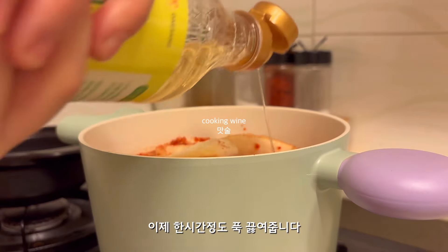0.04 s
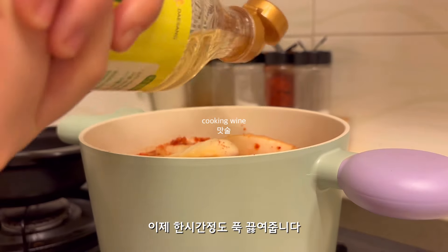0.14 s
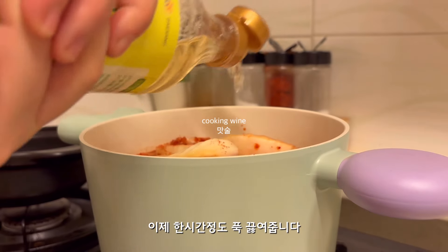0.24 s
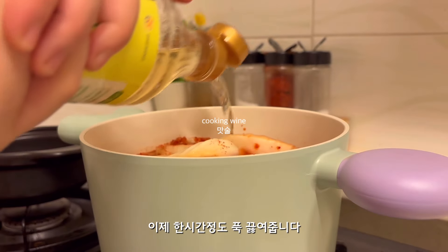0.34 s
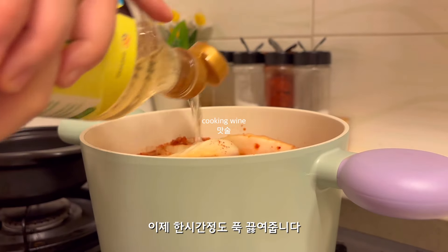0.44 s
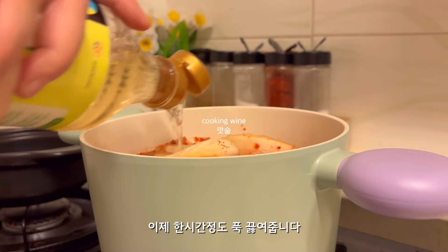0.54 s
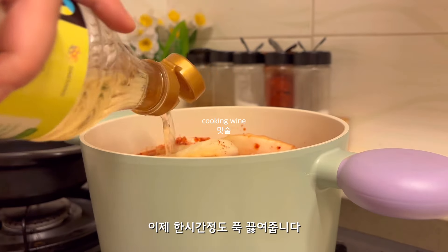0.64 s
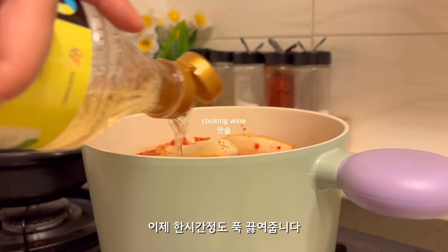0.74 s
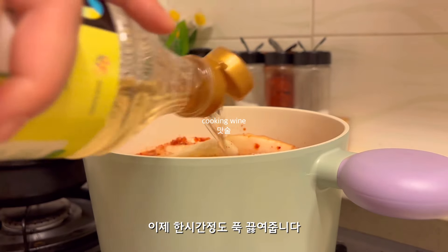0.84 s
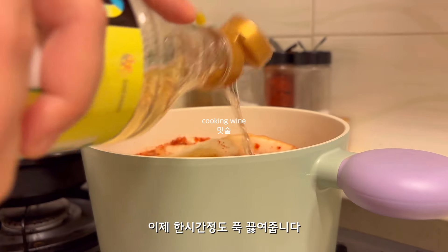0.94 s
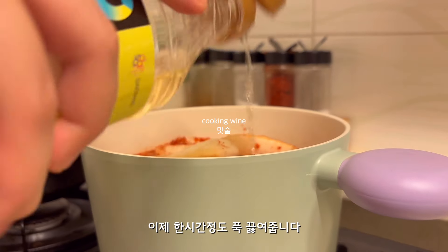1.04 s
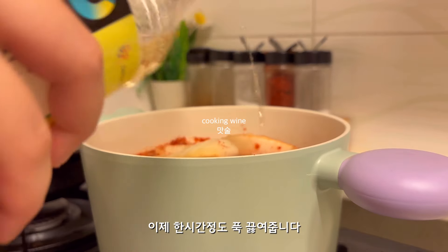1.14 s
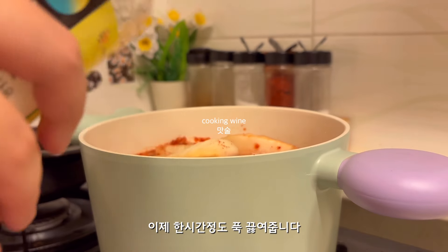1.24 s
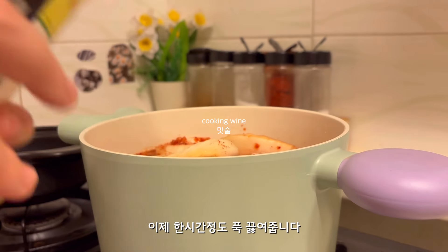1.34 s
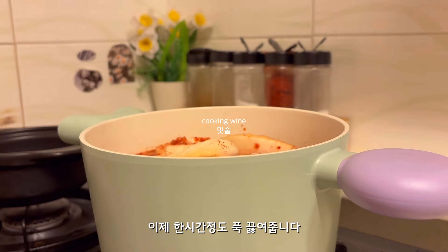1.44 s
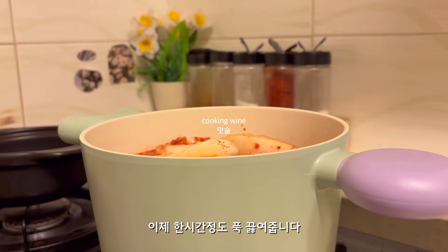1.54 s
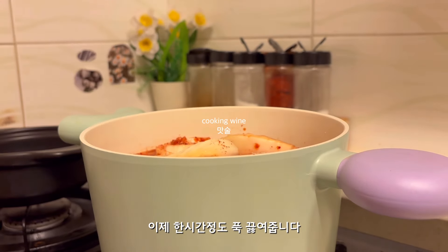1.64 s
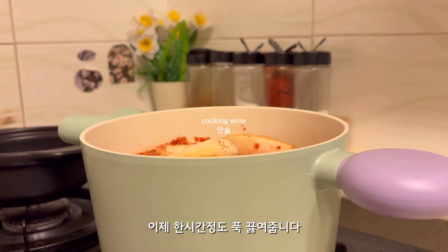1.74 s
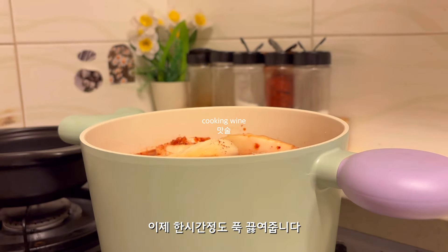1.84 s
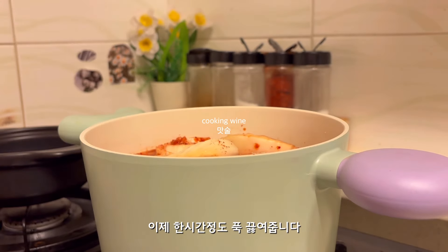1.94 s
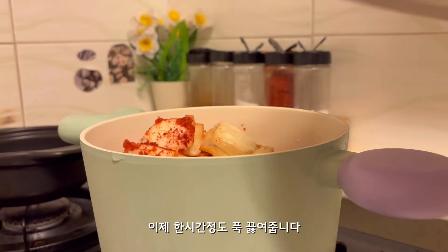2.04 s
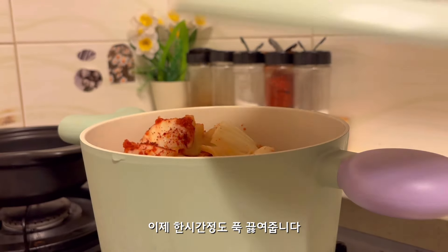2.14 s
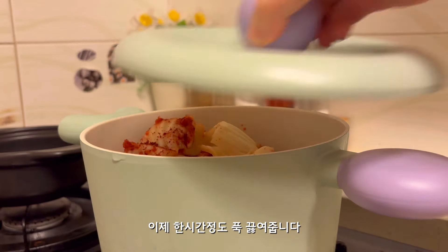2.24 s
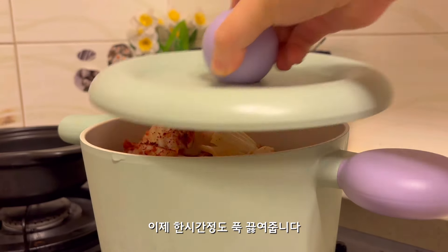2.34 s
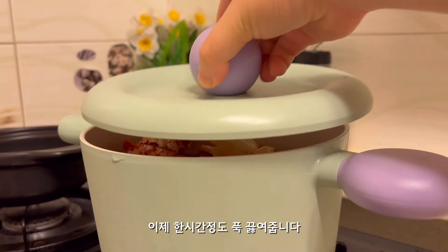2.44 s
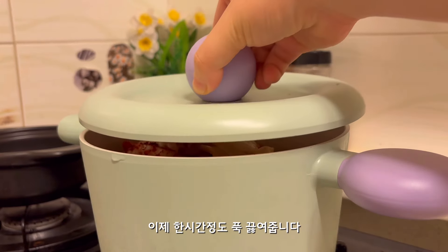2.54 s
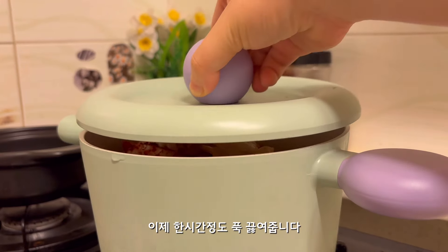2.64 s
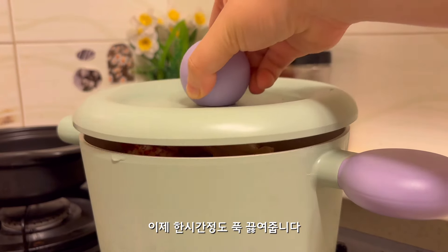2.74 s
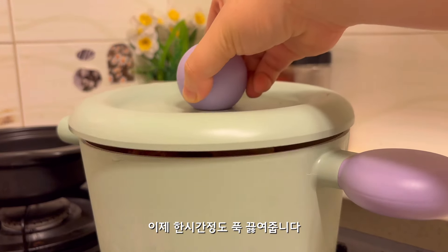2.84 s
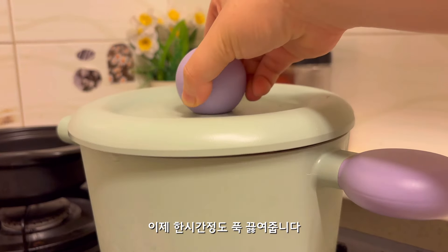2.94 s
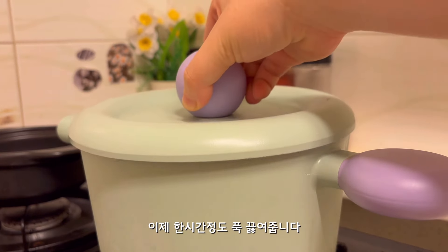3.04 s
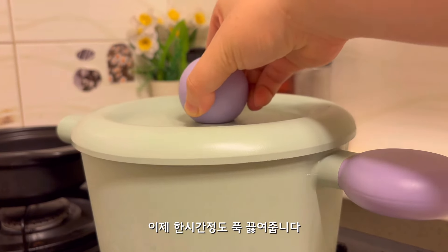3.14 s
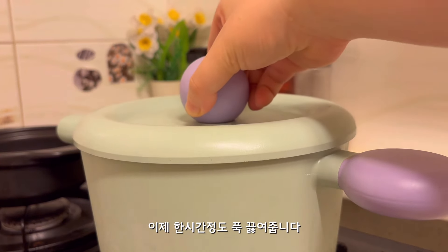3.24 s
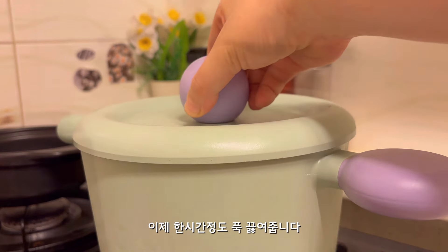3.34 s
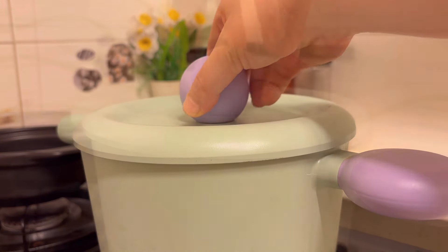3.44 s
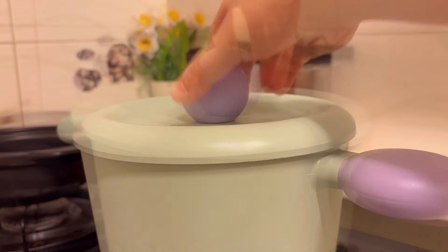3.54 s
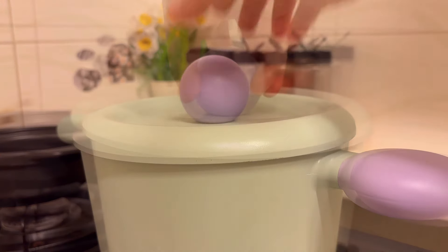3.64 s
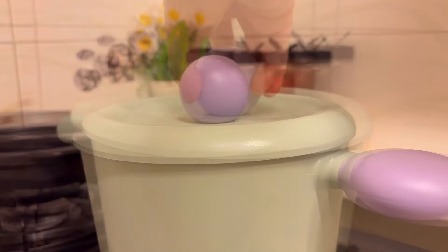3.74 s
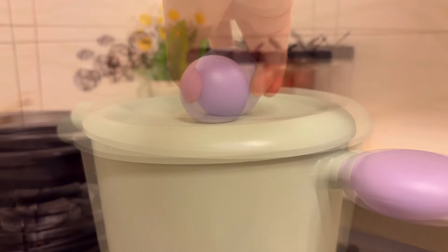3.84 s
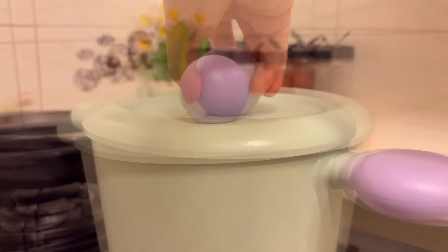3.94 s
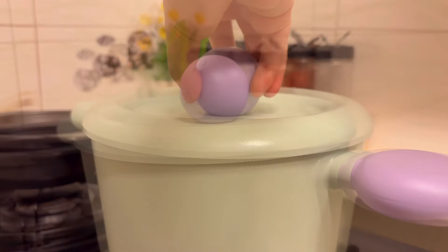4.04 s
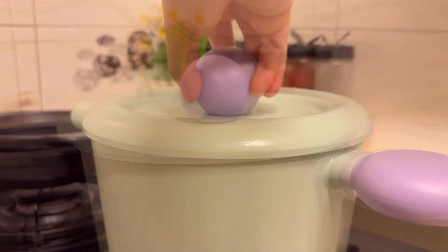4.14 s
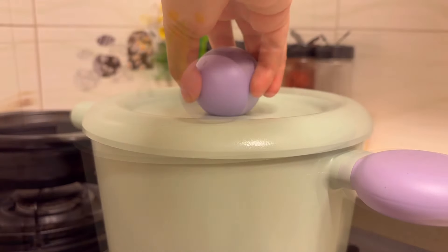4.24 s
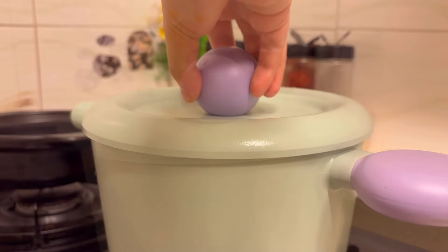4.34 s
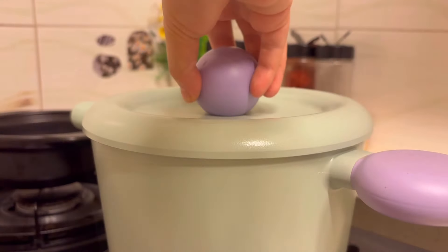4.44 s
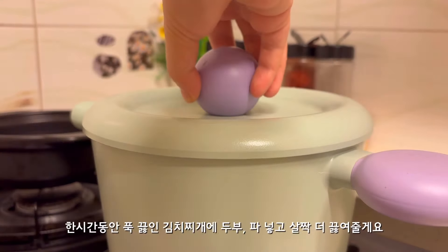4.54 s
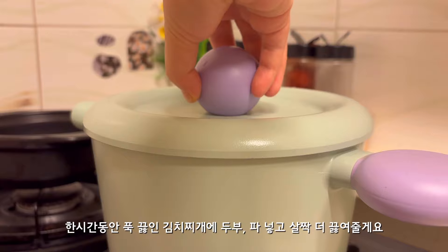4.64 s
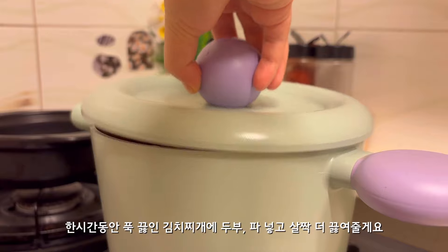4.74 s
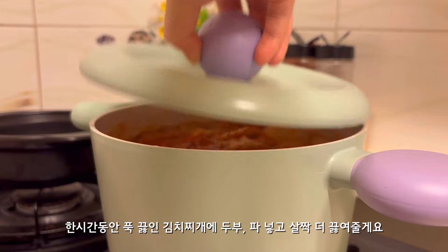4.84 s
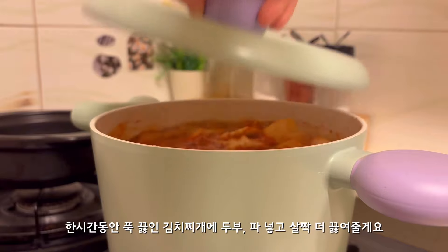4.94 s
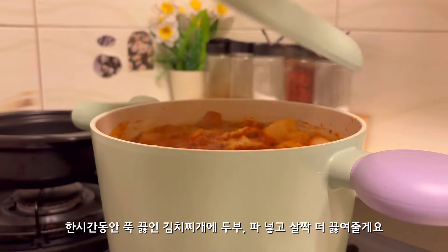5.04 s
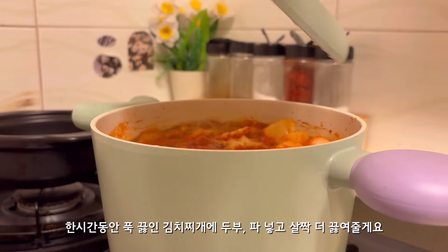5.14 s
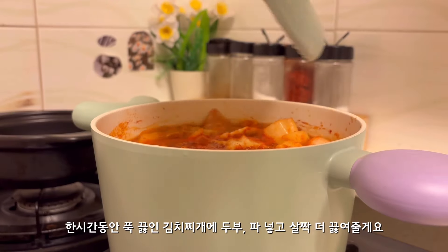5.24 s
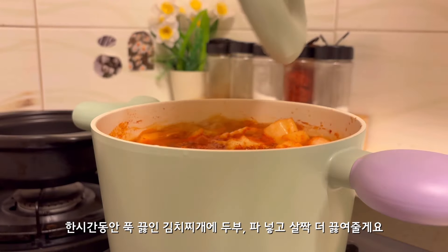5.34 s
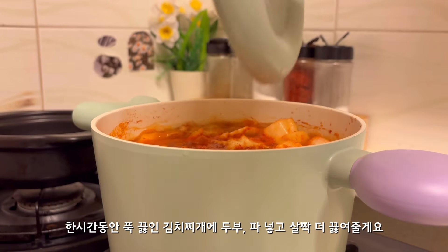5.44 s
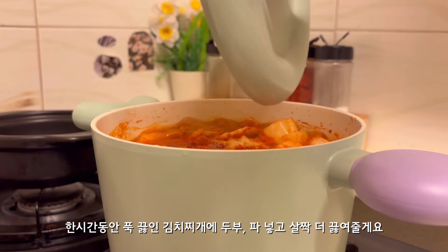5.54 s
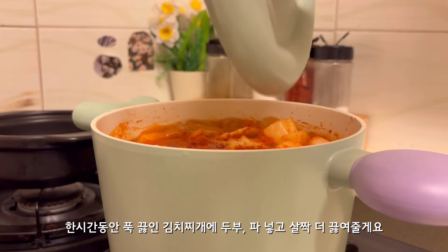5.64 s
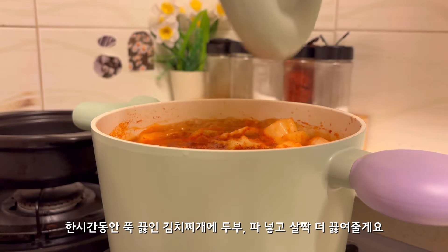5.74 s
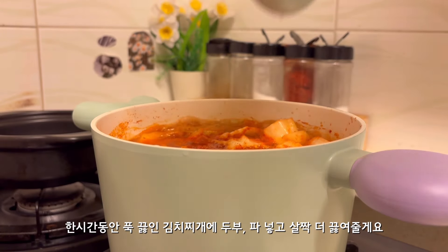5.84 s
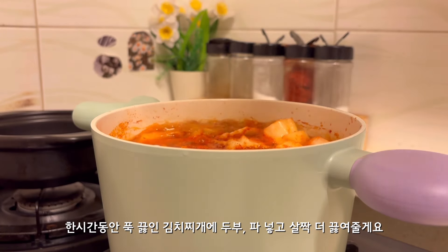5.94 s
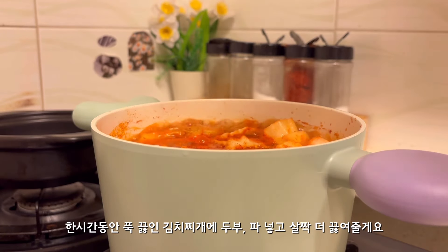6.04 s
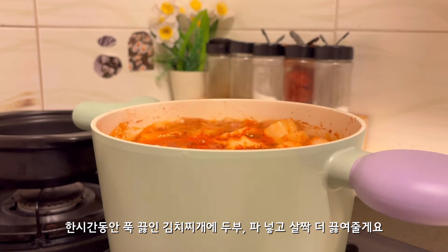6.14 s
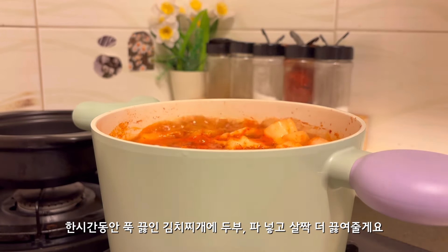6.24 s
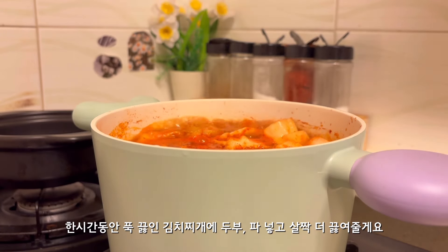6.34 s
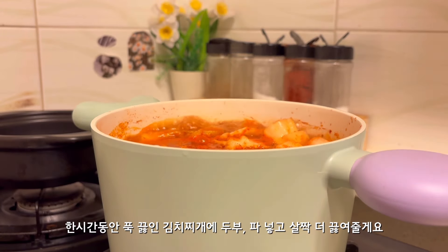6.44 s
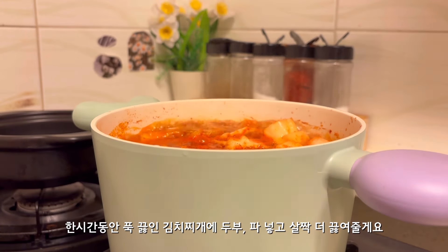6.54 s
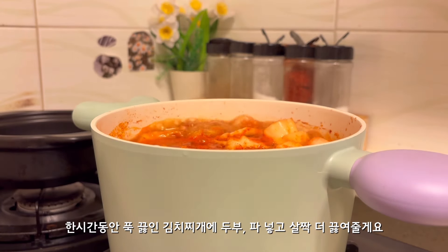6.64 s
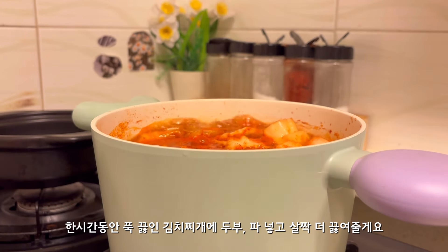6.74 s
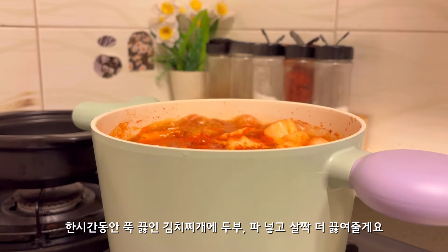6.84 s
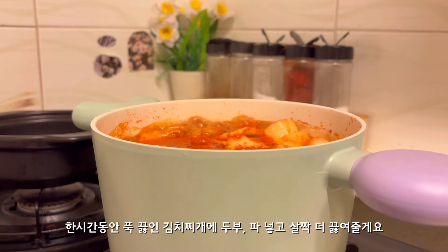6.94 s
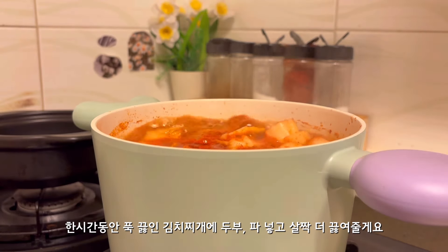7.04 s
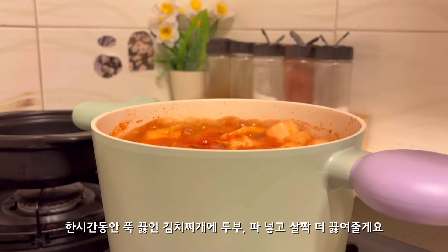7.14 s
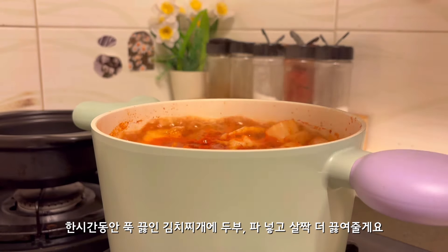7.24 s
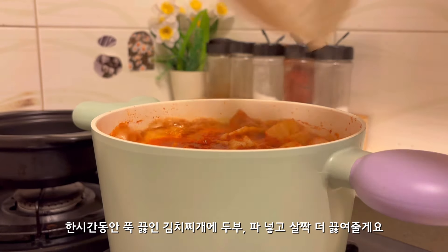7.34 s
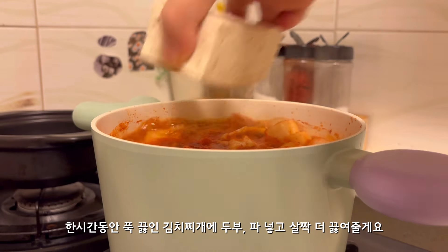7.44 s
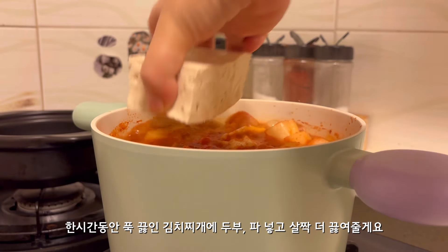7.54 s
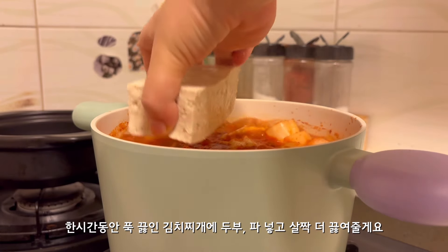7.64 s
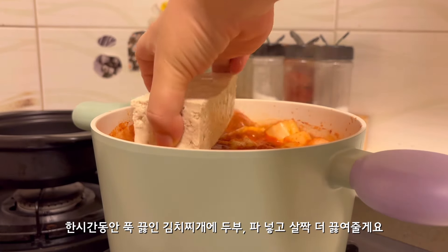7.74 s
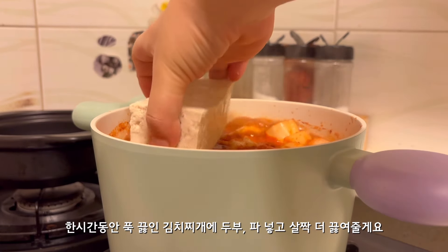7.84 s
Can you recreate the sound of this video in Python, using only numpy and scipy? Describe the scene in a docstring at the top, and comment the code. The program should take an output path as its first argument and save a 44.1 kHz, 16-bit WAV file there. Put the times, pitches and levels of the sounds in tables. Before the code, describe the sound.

A gas burner hisses, a plastic bottle crackles, a metal lid clatters onto a saucepan, then stew bubbles faster and faster.

```python
"""A tiled kitchen, a phone's stereo microphones close to a saucepan on a gas hob.
The burner roars and hisses on a high flame over the room's rumble. Around 1 s a plastic bottle
crackles as its wall flexes. At 3.1 s the metal lid clatters onto the pan, then fingers tap its knob.
At 4.5 s we jump ahead in time: the flame is low and the stew simmers, its bubbles popping
faster and faster as a hand lowers food into it."""
import sys
import numpy as np
from scipy import signal
from scipy.fft import rfft, irfft, next_fast_len
from scipy.io import wavfile
from scipy.ndimage import uniform_filter1d

SR = 44100
rng = np.random.default_rng(int(sys.argv[2]) if len(sys.argv) > 2 else 0)


def to_wav(s):
    """Save 16-bit WAV."""
    ch = np.atleast_2d(s).T  # columns
    pcm = np.round(np.clip(ch, -1, 1) * 32767)  # PCM
    wavfile.write(sys.argv[1], SR, pcm.astype(np.int16))


N = 347949
T = np.arange(N) / SR


def undb(db):
    """Decibels to gain."""
    return 10 ** (np.asarray(db) / 20)


def decay(t, t60):
    """An envelope that falls 60 dB in t60 seconds."""
    return np.exp(-np.log(1000) * t / t60)


def walk(rate, size):
    """Random levels held 1 / rate s and smoothed twice; spread near 1."""
    hold = int(SR / rate)
    steps = np.repeat(rng.standard_normal(size // hold + 2), hold)
    return 1.39 * uniform_filter1d(uniform_filter1d(steps, hold), hold)[:size]


def coloured(spectrum, size, flicker_db, strip_hz, rate=10):
    """Noise of rms 1 shaped by (frequency [Hz], level [dB]); three interleaved sets of strips flicker."""
    n = next_fast_len(size)
    f = np.arange(n // 2 + 1) * SR / n + 1e-9
    hz, db = np.transpose(spectrum)
    shape = undb(np.interp(np.log(f), np.log(hz), db, left=-200, right=-200))
    bins = rfft(rng.standard_normal(n)) * shape
    strip = (f / strip_hz + np.sin(f / strip_hz / 3.1)).astype(int) % 3
    noise = sum(irfft(bins * (strip == k), n)[:size] * undb(flicker_db * walk(rate, size))
                for k in range(3))
    return noise / np.sqrt(np.mean(noise ** 2))


def ring(hz, t60, glide=0., rise_s=0., lead=0.):
    """A decaying stereo sine; the pitch moves by 2 * glide * hz, the left side leads by lead radians."""
    t = np.arange(int(SR * t60)) / SR
    phase = 2 * np.pi * hz * t * (1 + glide * t / t60) + np.array([[lead], [-lead]]) / 2
    return np.sin(phase) * decay(t, t60) * np.minimum(t / (rise_s + 1e-9), 1)


def burst(hz, width_hz, t60):
    """A decaying puff of noise in a band, peak near 1."""
    edges = [max(hz - width_hz / 2, 50), min(hz + width_hz / 2, .45 * SR)]
    band = signal.butter(3, edges, "bandpass", fs=SR, output="sos")
    t = np.arange(int(SR * t60) + 200) / SR
    puff = signal.sosfilt(band, rng.standard_normal(len(t)) * decay(t, t60))
    onset_rms = np.sqrt(np.sum(puff ** 2) / (SR * t60 / np.log(1e6)))
    return puff / onset_rms / 2


def add(track, s, sound, pan_db=0.):
    """Mixes a sound in at s seconds, pan_db louder on the left than on the right."""
    start = int(s * SR)
    sound = np.atleast_2d(sound)[:, :max(N - start, 0)]
    track[:, start:start + len(sound.T)] += sound * undb(np.array([[pan_db], [-pan_db]]) / 2)


def kitchen_reverb(sound, t60=0.3, level_db=-7.5):
    """The tiled walls send back a short diffuse tail, starting 4 ms after the direct sound."""
    t = np.arange(int(SR * t60)) / SR
    mid, side = rng.standard_normal((2, len(t))) * decay(t, t60) * (t > .004)
    # long waves reach both microphones alike
    side = signal.lfilter(*signal.butter(1, 900, "highpass", fs=SR), side)
    tail = signal.lfilter([1], [1, -.6], [mid + side, mid - side])  # soft things swallow the treble
    tail *= undb(level_db) / np.sqrt(np.sum(tail ** 2, axis=1, keepdims=True))
    return signal.fftconvolve(sound, tail, axes=1)[:, :N]


def room_hum(t):
    """A low resonance of the kitchen swells and fades."""
    # shape of the resonance: (frequency [Hz], relative level [dB])
    spectrum = [(112, -22), (132, 0), (154, -24)]
    # its swells: (time [s], level [dB])
    swells = [(0, -50), (.45, -57.5), (1.5, -54.5), (2.2, -66), (3.7, -54), (4.5, -54.5), (5, -63),
              (5.4, -49), (6, -63), (6.6, -49), (7, -56), (7.4, -50.5), (7.89, -47.5)]
    gain = undb(np.interp(t, *np.transpose(swells)))
    return gain * coloured(spectrum, len(t), flicker_db=1.2, strip_hz=40, rate=5)


def burner(t, flame):
    """The flame's roar and a high hiss over the room's hum; flame is 0 for high, 1 for low."""
    # room air and flame roar as the phone hears them, with a gap in mid at 7-8.3 kHz;
    # mid and side, per flame: (frequency [Hz], relative level [dB])
    roar_mid = [
        [(15, -62), (25, -17), (70, 4.5), (134, -3.5), (190, -6), (330, -3.5), (560, -6.5), (1020, -16.5),
         (1450, -24.5), (2500, -22.5), (4300, -25.5), (6900, -26), (7400, -114), (9000, -70.5)],
        [(15, -33), (25, -10), (70, -1.5), (130, -4.5), (220, -8), (400, -13), (600, -16), (1000, -26.5),
         (1600, -30), (2800, -31), (4400, -29.5), (6900, -37), (7500, -80), (9000, -85)],
    ]
    roar_side = [
        [(15, -51.5), (25, -59.5), (113, 7.5), (207, -1.5), (245, 6.5), (826, 0.5), (3300, -15.5),
         (4980, -26.5), (8300, -1), (10800, -30.5), (18300, -120)],
        [(15, -99), (25, -67), (107, -11), (234, -9.5), (264, -12), (389, -11), (979, -16.5), (1050, -23.5),
         (8300, -35.5), (10800, -67), (18300, -120)],
    ]
    # high hiss as the phone hears it, with a hole below 8.3 kHz and a side notch near 11.6 kHz;
    # mid and side, per flame: (frequency [Hz], relative level [dB])
    hiss_mid = [
        [(4880, -111), (8300, -22.5), (9320, 2), (10100, 9), (10700, 11.5), (11100, 10.5), (11600, 2),
         (12600, -0.5), (13700, -2.5), (14600, -23.5)],
        [(8300, -35), (8700, -33.5), (9800, -19), (10600, -13), (11000, -8.5), (11500, -8), (11700, -22.5),
         (13600, -25), (14200, -40), (14600, -48)],
    ]
    hiss_side = [
        [(4880, -52.5), (8300, -11), (10100, 10), (11100, -4), (11400, -15.5), (11600, -42), (13000, -9),
         (14100, 2), (15500, -10)],
        [(4880, -31), (8300, -5), (10700, -5), (11300, -12.5), (11700, -30), (12500, -47.5), (12700, -8),
         (13500, -21), (15500, 2)],
    ]
    # starting levels, per flame: (roar [dB], roar drift [dB/s], hiss [dB], hiss drift [dB/s])
    flame_levels = [(-49, 0.63, -41, 0.32), (-52.5, 1.08, -55, -0.06)]
    # narrow resonances of rumble, burner ports and jet whistle:
    # (frequency [Hz], half-width [Hz], level on high flame [dB], level on low flame [dB])
    resonances = [(65.6, 9.7, -64, -58.5), (1750, 280, -66.5, -76), (3405, 110, -69.5, -74.5),
                  (4360, 350, -66.5, -73), (10440, 70, -49.5, -84), (10280, 50, -56.5, -77),
                  (1043, 70, -67, -75.5), (11180, 110, -63, -57), (12200, 72, -53.5, -90)]
    roar_side_db, hiss_side_db = (-9, -9.5)[flame], (-5.5, -9.5)[flame]  # relative to mid
    roar_db, roar_drift, hiss_db, hiss_drift = flame_levels[flame]
    roar_gain = undb(roar_db + roar_drift * (t - t[0]))
    hiss_gain = undb(hiss_db + hiss_drift * (t - t[0]))
    n = len(t)
    mid = roar_gain * coloured(roar_mid[flame], n, flicker_db=1.6, strip_hz=150)
    mid += hiss_gain * coloured(hiss_mid[flame], n, flicker_db=1.64, strip_hz=70, rate=25)
    for hz, width, *db in resonances:
        peak = [(hz - width, -20), (hz, 0), (hz + width, -20)]
        mid += undb(db[flame]) * coloured(peak, n, flicker_db=3, strip_hz=40, rate=18)
    mid += room_hum(t)
    wide_roar = roar_gain * coloured(roar_side[flame], n, flicker_db=1.7, strip_hz=151.5)
    wide_hiss = hiss_gain * coloured(hiss_side[flame], n, flicker_db=1.55, strip_hz=70, rate=22)
    side = undb(roar_side_db) * wide_roar + undb(hiss_side_db) * wide_hiss
    return np.array([mid + side, mid - side])


def bottle_crackle(track):
    """Thin plastic snaps as it flexes: each wide click rings a patch of the bottle's wall."""
    # snaps of the wall: (time [s], ring level [dB], frequency [Hz], click level [dB])
    snaps = [(0.845, -46, 3760, -56), (0.868, -47, 3520, -54), (1.137, -46, 4800, -59),
             (1.23, -46.5, 5260, -39), (1.286, -43.5, 2400, -30), (1.303, -39.5, 3340, -55),
             (1.513, -44, 3870, -54), (1.555, -38.5, 4270, -49)]
    for s, db, hz, click_db in snaps:
        add(track, s, undb(db) * burst(hz, 0.22 * hz, t60=0.052))
        add(track, s, undb(click_db) * burst(2800, 4600, t60=0.0028))


def bottle_slip(track):
    """Fingers slip on the bottle: a scrape full of small snaps swells, then fades."""
    # colour of the scrape: (frequency [Hz], relative level [dB])
    spectrum = [(600, -27), (1000, -4), (1500, -4), (2200, 1), (3000, -4), (4500, -7), (6800, -13)]
    start_s, end_s, ramp_s, hold_s = 1.37, 1.49, 0.025, 0.011
    level_db, fade_db_per_s = -47, 129
    t = T[T < end_s - start_s]
    swell = np.minimum(np.minimum(t, t[::-1]) / ramp_s, 1)
    grip = swell * undb(level_db - fade_db_per_s * np.maximum(t - ramp_s - hold_s, 0))
    roughness = undb(2 * walk(310, len(t)))
    scrape = coloured(spectrum, len(t), flicker_db=2.7, strip_hz=515, rate=68)
    add(track, start_s, grip * roughness * scrape)
    for when, pitch, size in rng.random((36, 3)):
        i, hz = int(when * len(t)), 900 * 5.2 ** pitch
        snap = undb(-0.5 - 4 * np.log(size)) * burst(hz, 0.15 * hz, t60=0.021)
        add(track, start_s + t[i], grip[i] * snap)


def lid_first_touch(track, s, touches):
    """The rim clicks and air squeezed in the gap rings, sinking as it closes; later touches damp it."""
    add(track, s, undb(-19) * burst(6000, 9000, t60=.006))
    air = ring(583, t60=0.23, glide=-0.89, rise_s=0.0033, lead=0.6)
    closing = uniform_filter1d(undb(-5 * touches), size=200)
    add(track, s, undb(-11) * air * closing[:len(air.T)], pan_db=-1.5)


def lid_clatter(track):
    """Each contact lands elsewhere on the rim, so each mode gets a new share; long contacts are duller."""
    # rim contacts: (time [s], ring level [dB], contact length [ms], crack level [dB],
    # thud level [dB], change to the earlier ringing [dB])
    contacts = [(3.096, -13.5, 0.12, -8, -27.5, -1), (3.120, -19, 0.034, -14, -25.5, 0.5),
                (3.142, -21, 0.054, -12, -15.5, -9), (3.1526, -11.5, 0.16, -14.5, -28, -6),
                (3.158, -47, 0.2, -23.5, -33, -1.5), (3.165, -46, 0.23, -29, -22, -3.5),
                (3.199, -50, 0.26, -21.5, -21.5, -4), (3.228, -43, 0.24, -30, -47, -0.5)]
    # modes of lid and pan wall: (frequency [Hz], level struck on an edge [dB],
    # level landing flat [dB], t60 [s], lead at the left microphone [rad])
    metal_modes = [(1080, -12.5, -10, 0.22, 2), (1348, -14.5, -7, 0.12, 2), (1588, -15, -14.5, 0.11, 2),
                   (1750, -16, -16, 0.14, 0), (2043, -18.5, -9, 0.038, 0), (2448, -12, -10, .33, .6),
                   (2925, 1, 4, .2, .7), (2944, -16, -9, .45, .8), (2967, 4, -12, .18, .5),
                   (3015, -12, 3, .14, .7), (3036, -22, -16, .45, .7), (3215, -16, -16, .13, .5),
                   (3343, -20, -20, .14, .5), (3880, -3, -9, .11, .5), (3946, -18, -20, .2, .5),
                   (4568, -26, -18, .25, 0), (4955, 0, -11, .11, 1), (5003, -2, -9, .1, .8),
                   (5097, -8, -2, .17, .8), (5140, -16, -11, .33, .5), (5491, -21, -21, .15, -1),
                   (5654, -10, -12, .14, -1.5), (6145, -16, -9, .19, -1.5), (7289, -14, -11, .21, -2.5),
                   (7418, -26, -26, .2, -2.5), (8200, -29.5, -24, .2, -8), (9760, -9.5, -13, .22, 2),
                   (9765, -23, -20, .2, 13.5)]
    # modes of the pan body and the air inside: (frequency [Hz], level [dB], t60 [s])
    body_modes = [(88, -22, .3), (131.8, -4, .14), (240, -5, .14), (312.4, 2, .12), (416.6, -7.5, .09),
                  (617, -9, .1)]
    flat_s = 3.13  # from here on the lid lands flat
    for s, ring_db, contact_ms, crack_db, thud_db, _ in contacts:
        touches, damping_db = np.zeros((2, SR))
        for later_s, *_, change_db in contacts:
            if later_s > s:
                touched = T[:SR] > later_s - s
                touches += touched
                damping_db += change_db * touched
        damping = uniform_filter1d(undb(damping_db), size=100)
        shares = rng.standard_normal((len(metal_modes), 2))
        for (hz, edge_db, flat_db, t60, lead), (size, pan) in zip(metal_modes, shares):
            gain = undb(ring_db + (flat_db if s > flat_s else edge_db) + 1.1 * size)
            dulling = 1 / (1 + (hz * contact_ms / 1000) ** 2)
            mode = ring(hz, t60, rise_s=0.004, lead=lead)
            add(track, s, dulling * gain * mode * damping[:len(mode.T)], pan_db=3 * pan)
        add(track, s, undb(crack_db + 1) * burst(1500, 1700, t60=.014))
        add(track, s, undb(crack_db - 17) * burst(1700, 1800, t60=0.21))  # many small modes rattle
        add(track, s, undb(crack_db - 19) * burst(4700, 3300, t60=0.17))
        for hz, db, t60 in body_modes:
            mode = ring(hz, t60, rise_s=0.005)
            add(track, s, undb(thud_db + db) * mode * damping[:len(mode.T)], pan_db=-1.5)
        if s == contacts[0][0]:
            lid_first_touch(track, s, touches)


def knob_taps(track):
    """Fingers tap the lid's knob: a low knock and two bright ticks, shaking the lid and the pan."""
    # finger taps: (time [s], knock level [dB], tick level [dB])
    taps = [(3.956, -39.5, -42), (4.076, -33, -34.5), (4.091, -36.5, -47.5), (4.276, -37.5, -41)]
    for s, db, tick_db in taps:
        add(track, s, undb(db) * burst(667, 560, t60=0.2624))
        add(track, s, undb(db - 0.5) * burst(248, 88, t60=0.35))  # the closed pan booms
        add(track, s, undb(tick_db) * burst(1900, 260, t60=0.04264))
        add(track, s, undb(db - 5.5) * burst(1240, 2100, t60=0.17))  # the loose lid chatters
        add(track, s, undb(tick_db - 3.5) * burst(4845, 600, t60=0.0287))


def pop(track, s, db, hz, cycles, pan_db):
    """A bursting bubble rings briefly, climbing as its cavity opens; droplets follow, big ones slop."""
    cavity = ring(hz, cycles / hz, glide=0.12, rise_s=0.62 / hz)
    film_tear = burst(1600, 1900, t60=.014)
    overtone = ring(1.64 * hz, .7 * cycles / hz, glide=.13, rise_s=.5 / hz)
    droplets = burst(1.14 * hz, 1.04 * hz, t60=0.027)
    slop = burst(333, 470, t60=0.069)
    slop_db = -6 - 3 * np.log2(hz / 1000)
    for part, part_db in (cavity, 3.5), (film_tear, -9), (overtone, -9), (slop, slop_db):
        add(track, s, undb(db + part_db) * part, pan_db)
    add(track, s + 0.0048, undb(db - 13) * droplets, pan_db)


def simmer(track):
    """Small bubbles burst at random, ever faster; most are rising blips, a few are full pops."""
    # build-up of the simmer: (time [s], rate [bursts/s], level [dB])
    build_up = [(4.55, 14, -59), (5.2, 32, -54), (6.5, 55, -53), (7.2, 150, -50), (7.89, 220, -47)]
    pop_share = .1
    times, rates, levels = np.transpose(build_up)
    draws = rng.random((400, 6))
    arrivals = np.cumsum(-np.log(draws[:, 0]))
    expected_count = np.cumsum(np.interp(T, times, rates, left=0)) / SR
    for count, (_, pitch, size, length, pan, kind) in zip(arrivals, draws):
        if count >= expected_count[-1]:
            break
        s = np.searchsorted(expected_count, count) / SR
        db, pan_db = np.interp(s, times, levels), 3 * pan - 2
        if kind < pop_share:
            pop(track, s, db - 0.5 * size, hz=950 * 1.7 ** pitch, cycles=27, pan_db=pan_db)
        else:
            hz = 700 * 3.2 ** pitch
            blip = ring(hz, (3 + 5 * length) / hz, glide=0.57, rise_s=0.00028)
            add(track, s, undb(db - 2.7 * np.log(size)) * blip, pan_db)


def stew(track):
    """Steam breaks through the thick stew near the microphones: pops, glugs and spits over a simmer."""
    # the loudest bubbles bursting: (time [s], level [dB], frequency [Hz], ring length [cycles])
    pops = [(4.761, -46.5, 1480, 12.5), (4.991, -31, 1900, 4.8), (5.004, -41, 1100, 7.6),
            (5.026, -42, 1600, 9.9), (5.201, -42.5, 1090, 6.7), (5.298, -47, 1400, 8),
            (5.32, -34, 1040, 7.6), (5.322, -36.5, 560, 2.8), (5.33, -41, 1060, 5), (5.478, -41, 1750, 13),
            (5.481, -43, 2030, 12), (5.485, -34.5, 1293, 12), (5.5, -41, 1700, 4.2),
            (5.506, -31, 1700, 4.2), (5.642, -31.5, 1380, 11), (5.647, -39, 1360, 14),
            (5.689, -38.5, 850, 6.4), (5.704, -51, 1200, 6), (5.71, -45, 1090, 11), (5.767, -46, 1100, 12),
            (5.814, -40, 1220, 8.6), (6.006, -38, 1200, 5), (6.047, -39, 1220, 13), (6.08, -43, 1900, 11),
            (6.112, -41, 2400, 6.6), (6.185, -43, 1490, 14), (6.215, -41, 700, 5.7), (6.23, -37, 1310, 5.8),
            (6.288, -45, 1140, 23), (6.296, -42, 1450, 11), (6.416, -39, 1270, 7.9),
            (6.542, -41, 1110, 7.1), (6.575, -45, 1180, 7.8), (6.639, -40, 1060, 8.9),
            (6.649, -36, 1010, 10), (6.764, -40, 1710, 14), (6.84, -46, 1154, 12), (6.873, -47, 1070, 15),
            (6.958, -42, 1900, 9), (7.004, -33.5, 1690, 5.6), (7.087, -42, 2000, 6.4),
            (7.101, -36.5, 1090, 13), (7.126, -40, 1500, 8), (7.158, -34, 1060, 3.8), (7.176, -44, 1800, 8),
            (7.203, -37, 2000, 5), (7.216, -43, 1700, 7), (7.227, -42, 1500, 7), (7.235, -41, 1190, 14),
            (7.249, -40, 1000, 8.6), (7.304, -35.5, 1000, 3.9), (7.337, -38, 1147, 11),
            (7.366, -37, 2400, 6), (7.392, -34, 1800, 6.5), (7.408, -34, 1020, 7.1),
            (7.437, -32, 1500, 5.8), (7.445, -39, 1700, 4.6), (7.451, -36, 1710, 8.9),
            (7.47, -34, 1030, 8.8), (7.514, -42, 1800, 6), (7.522, -28, 1300, 3.8), (7.534, -38, 2100, 19),
            (7.543, -34.5, 1160, 7.1), (7.604, -33, 1500, 7.9), (7.612, -36, 1370, 10),
            (7.634, -39, 1610, 6.6), (7.698, -41, 1175, 11), (7.709, -36, 1390, 6.7),
            (7.721, -33.5, 1440, 16), (7.734, -43, 1600, 6), (7.7586, -28.5, 1610, 3.6),
            (7.771, -29, 1180, 7.9), (7.782, -28, 1300, 5.5), (7.792, -36, 1800, 5.5),
            (7.825, -45, 1208, 7), (7.849, -37.5, 1134, 10), (7.864, -35, 2200, 7), (7.873, -36, 1600, 3.9),
            (7.881, -30.5, 1600, 5.8)]
    # large steam pockets heaving the surface: (time [s], level [dB], frequency [Hz])
    glugs = [(5.339, -42, 150), (6.041, -50, 170), (6.239, -40, 180), (7.173, -34, 197), (7.201, -33, 188),
             (7.221, -45, 180), (7.26, -41, 170), (7.336, -40, 200), (7.428, -36.5, 181)]
    # film snapping with a spit of liquid: (time [s], spit level [dB], frequency [Hz], snap level [dB])
    spits = [(4.988, -40, 4100, -56), (5.406, -39, 4750, -35), (7.16, -40, 4100, -52),
             (7.452, -37, 4100, -46), (7.527, -42, 4900, -56), (7.62, -44, 4400, -45),
             (7.7585, -35, 4650, -26.5)]
    for (s, db, hz, cycles), pan in zip(pops, rng.standard_normal(len(pops))):
        pop(track, s, db, hz, cycles, pan_db=4 * pan)
    for s, db, hz in glugs:
        add(track, s, undb(db + 3.5) * ring(hz, t60=6 / hz, glide=.3, rise_s=.003))
    for s, db, hz, snap_db in spits:
        add(track, s, undb(db - 3.5) * burst(hz, 0.51 * hz, t60=0.042))
        add(track, s, undb(snap_db) * burst(7400, 16000, t60=0.0049))
    simmer(track)


def scene():
    """Lid, bottle and stew, heard from close by, ring in the kitchen above the burner."""
    jump_s = 4.518  # the flame is low from here on
    lid_send_db = -5  # the lid is nearer the phone than the walls, so less of it comes back
    close, lid = np.zeros((2, 2, N))
    lid_clatter(lid)
    knob_taps(lid)
    bottle_crackle(close)
    bottle_slip(close)
    stew(close)
    reverb = kitchen_reverb(close + undb(lid_send_db) * lid)
    hob = np.hstack([burner(T[T < jump_s], flame=0), burner(T[T >= jump_s], flame=1)])
    return hob + reverb + close + lid


def record(dry):
    """The phone beside the hob cuts the top of the treble steeply."""
    top_hz = 15600
    return signal.sosfilt(signal.ellip(10, .2, 90, top_hz, fs=SR, output="sos"), dry)


dry = scene()
out = record(dry)
to_wav(out)
```